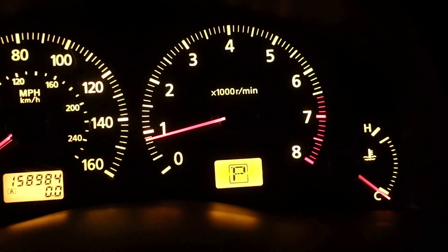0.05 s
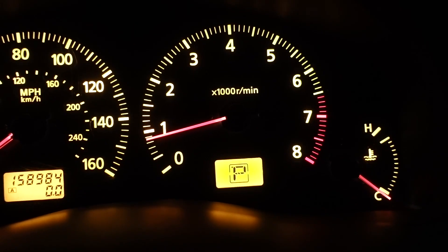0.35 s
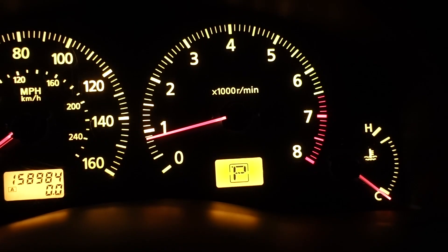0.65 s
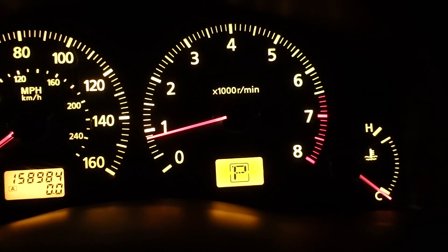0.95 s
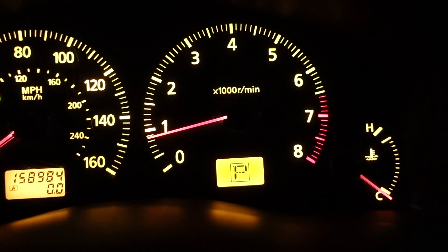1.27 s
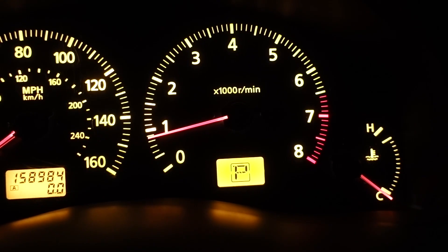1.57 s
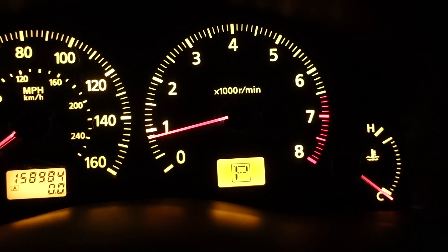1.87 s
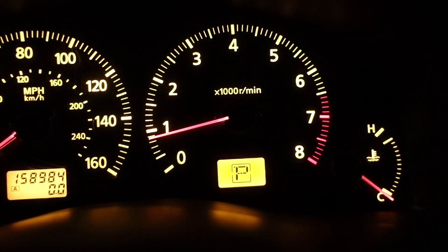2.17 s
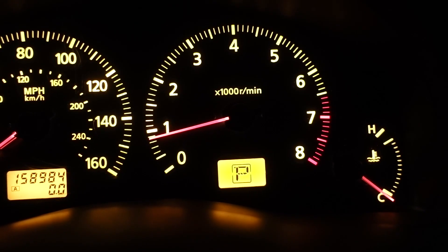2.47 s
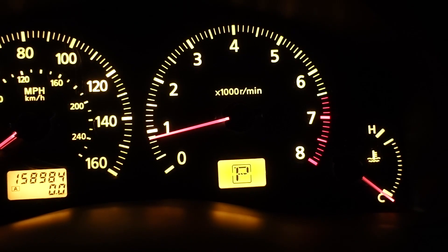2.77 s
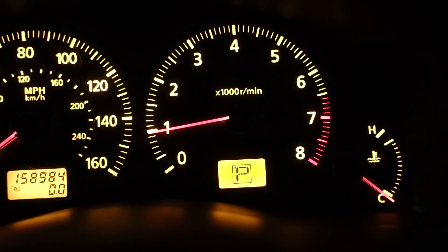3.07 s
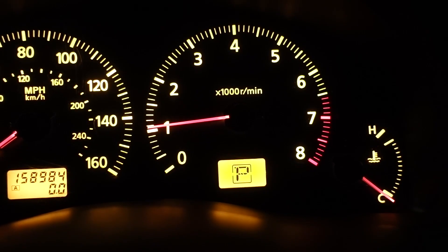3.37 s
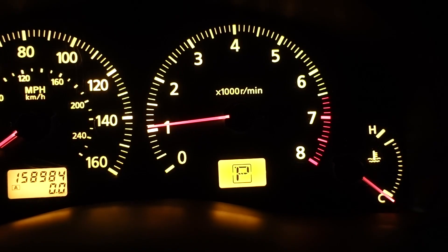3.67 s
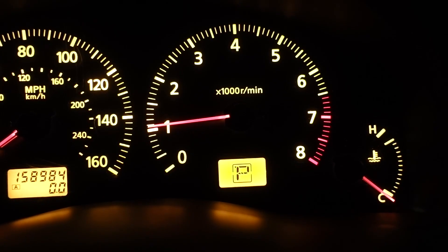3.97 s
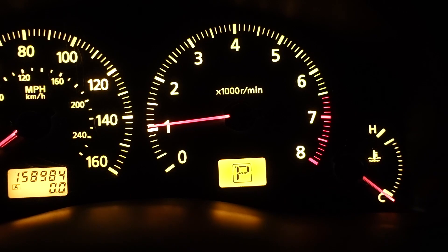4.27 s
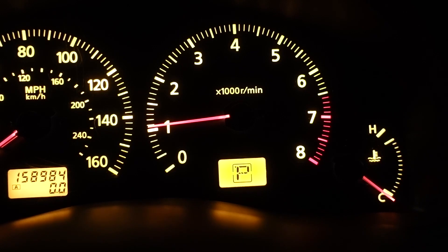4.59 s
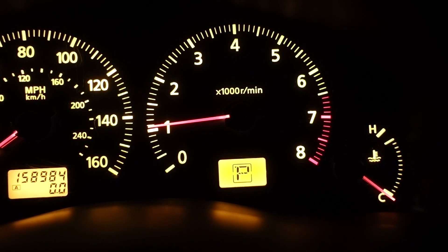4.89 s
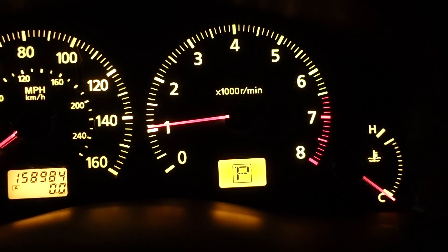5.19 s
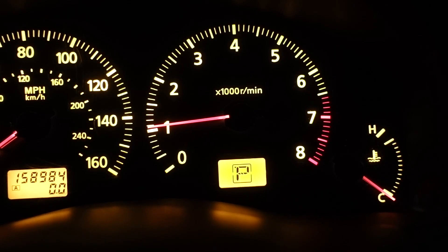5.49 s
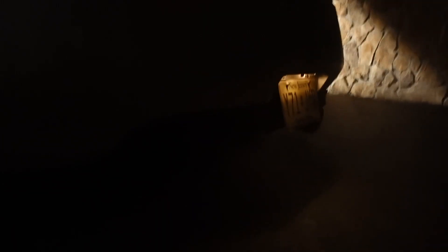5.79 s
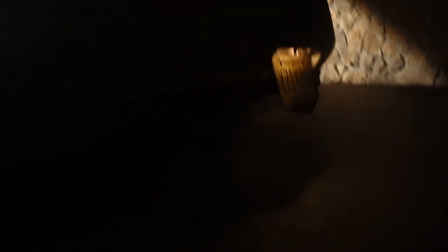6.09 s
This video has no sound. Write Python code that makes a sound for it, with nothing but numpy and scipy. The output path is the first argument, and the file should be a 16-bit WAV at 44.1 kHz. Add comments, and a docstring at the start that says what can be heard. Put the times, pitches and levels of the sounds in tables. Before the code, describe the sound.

Heard from the cabin, a misfiring car engine chugs, rises to a smoother fast idle, then is suddenly heard outside, slower and louder.

```python
"""A cold six-cylinder car engine idles in a garage, heard from the driver's seat.
It misfires and sags about four times a second, then the speed rises and the beat evens out.
Firing pulses boom through the exhaust, buzz the panels and swell the gas rush; accessories hiss and
whine. Near the end the listener is abruptly outside, where the slow idle booms and stumbles again."""
import sys
import numpy as np
from scipy import signal
from scipy.fft import rfft, irfft, next_fast_len
from scipy.io import wavfile
from scipy.ndimage import uniform_filter1d, minimum_filter1d

SR = 44100
rng = np.random.default_rng(int(sys.argv[2]) if len(sys.argv) > 2 else 0)


def dump(signal):
    """Clip the signal to [-1, 1] and save it as 16-bit WAV at the path in sys.argv[1]."""
    limited = np.clip(np.atleast_2d(signal).T, -1, 1)
    pcm = np.round(limited * 32767).astype(np.int16)
    wavfile.write(sys.argv[1], SR, pcm)


N = 279505
FFT_SIZE = next_fast_len(N + SR)
TIME_S, BIN_HZ = np.arange(N) / SR, np.fft.rfftfreq(FFT_SIZE, 1 / SR)
OUTSIDE_AT_S, RISE_AT_S = 5.595, 2.924

# Each row: time in seconds, dip of firing strength in dB.
MISFIRES = [(0.099, -4.5), (0.363, -14.5), (0.619, -7.5), (0.881, -9), (1.178, -11), (1.418, -9),
            (1.684, -13), (1.967, -14.5), (2.239, -8), (2.509, -7.5), (6.207, -20), (6.284, -17)]
# Firing order; two banks with unequal pipes alternate. Each row: strength in dB, lag in seconds.
FIRING_ORDER = [(-1.07, 0.004413), (0.5, 0.005507), (-1.5, .0045), (2.03, 0.005474), (-1, 0.004455),
                (1.4, 0.0053)]
# Exhaust and air resonances at each place. Each row: frequency in Hz, width in Hz, gain in dB.
CABIN_MODES = [(45.2, 4.2, -11.5), (87.2, 26.3, -2.54), (117, 12.5, -3.5), (152.94, 42.56, 8),
               (165.2, 38.68, 9), (198.03, 7.47, -0.6), (260.2, 24.3, -15), (288.9, 25.3, -18)]
GARAGE_MODES = [(55.32, 17, -5), (97.7, 43.6, 0.1), (117, 4.9, -4.5), (147.6, 16.49, 14),
                (156.8, 27.6, 12.5), (199, 5, -6), (271.4, 28.4, -9), (286.2, 12, -4.5)]
# Panel and pipe resonances. Each row: frequency in Hz, width in Hz, gain in dB.
PANEL_MODES = [(387.8, 9.4, 5.5), (430, 50, -8), (540.7, 12, -2.5), (655, 40, -12), (704.6, 24, -10),
               (985, 10, -16.5), (1210, 47, -19.5)]
# Spectral shapes. Each row: frequency in Hz, relative level in dB.
RUSH_SPECTRUM = [(150, -24.5), (270, 6), (400, 1.5), (520, 1.5), (720, -2), (820, -11), (1250, -13.5),
                 (1500, -23), (2500, -26.5), (5000, -51.5)]
CABIN_HISS_SPECTRUM = [(600, -12.5), (1500, 0.5), (2200, -1.5), (2900, 0), (3400, -4.5), (4400, -4.5),
                       (5200, -8.5), (6500, -16), (8500, -16), (11000, -20.5)]
GARAGE_HISS_SPECTRUM = [(600, -11), (1300, 11.5), (2000, 8), (2600, 3), (3200, -4.5), (4300, -1.5),
                        (5500, -9), (7500, -17), (11000, -29.5)]
RUMBLE_SPECTRUM = [(10, -5.5), (30, -2.5), (50, -1), (100, 2.5), (180, -1), (230, -9.5), (300, -12),
                   (450, -31), (900, -63.5)]
TICK_SPECTRUM = [(200, -10), (550, 2), (1000, -3), (2000, -13), (4000, -26), (10000, -50)]
# Each row: time in seconds, relative peak in dB.
TICK_EVENTS = [(2.7156, -43.5), (2.756, -38.5), (3.0668, -39), (3.1007, -37.5), (3.168, -39), (3.2678, -36),
               (4.3369, -39), (4.7185, -38.5), (5.9687, -33), (6.0126, -34.5)]
# Each row: frequency in Hz, level in dB, rms waver in Hz, change at top speed in dB.
ACCESSORY_TONES = [(386.3, -45.5, 5, -10), (976, -61.5, 8, -3), (1196, -60.5, 25, -4),
                   (1333, -64.5, 22, -6.5), (3650, -76, 30, -4), (4170, -68, 28, -2), (4320, -75, 45, 1.5),
                   (6690, -80, 22, 2.5), (10800, -82.5, 9.7, -2)]
# Each row: frequency in Hz, left lead in radians, left-right coherence, left minus right in dB.
STEREO_IMAGE = [(30, .35, 1, 0), (75, .5, 1, 0), (180, .96, 1, 0), (520, 1.45, .97, -1.2),
                (1100, 1.2, .87, -1.5), (2000, 1.1, .7, -3), (4000, 1.4, .5, -5), (6000, 1.7, .45, -9),
                (10500, 3, .4, -11)]


def firings(gap_s=.027, sag=.12, recovery_s=.031, fast_db=-1.5, throttle_db=2,
            scatter_db=1.23, jitter_s=.0001, limp_db=1.5, limp_until_s=2.2):
    """Time, strength and cylinder of each firing; a misfire slows the crank, which then recovers."""
    misfire_s, depth_db = np.transpose(MISFIRES)
    since_s = TIME_S[:, None] - misfire_s
    dip_db = bell(since_s, gap_s) @ depth_db
    effort_db = by_place(fast_db * fast_idle() + throttle_db * throttle(), 0)
    age = np.maximum(1 + since_s / recovery_s, 0)
    speed_loss = sag * (age * np.exp(1 - age)).sum(1)
    rate_hz = crank_rpm() * (1 - speed_loss) * 3 / 60  # three firings a turn
    count = np.cumsum(rate_hz) / SR
    number = np.arange(-len(FIRING_ORDER), int(count[-1]))
    times_s = np.interp(number, count, TIME_S) + np.minimum(number, 0) / rate_hz[0]
    cylinder = number % len(FIRING_ORDER)
    cylinder_db, lag_s = np.array(FIRING_ORDER)[cylinder].T
    bank_db = limp_db * (2 * (cylinder % 2) - 1) * (times_s < limp_until_s)  # one bank pulls harder
    scatter, jitter = rng.standard_normal((len(number), 2)).T
    drive_db = np.interp(times_s, TIME_S, effort_db + dip_db)
    strength = amp(drive_db + cylinder_db + bank_db + scatter_db * scatter)
    return times_s + lag_s + jitter_s * jitter, strength, cylinder


def crank_rpm(slow_rpm=941.6, fast_rpm=1138.6, outside_rpm=897.7, settle_s=.364):
    """Speed before misfire sag: climbs, overshoots, settles; slow again outside."""
    flare_rpm = 171.9 * np.exp(-np.maximum(TIME_S - RISE_AT_S, 0) / settle_s)
    return by_place(slow_rpm + fast_idle() * (fast_rpm + flare_rpm - slow_rpm), outside_rpm)


def fast_idle(rise_s=.141):
    """Rises from 0 at slow idle to 1 at fast idle."""
    return 1 / (1 + np.exp(-(TIME_S - RISE_AT_S) / rise_s))


def throttle(at_s=2.97, sigma_s=.2):
    """The idle valve opens once: 0 to 1 and back."""
    return bell(TIME_S - at_s, sigma_s)


def exhaust(times_s, strength, cabin_db=38, garage_db=40, cabin_lag_s=.01332, garage_lag_s=.016):
    """Rounded pressure pulses leave the pipe and boom in the cabin or the garage."""
    pulse = lowpass(corner_hz=450)
    inside = stereo(clicks(times_s + cabin_lag_s, strength) * pulse * ring(CABIN_MODES))
    outside = stereo(clicks(times_s + garage_lag_s, strength) * pulse * ring(GARAGE_MODES))
    return -by_place(amp(cabin_db) * inside, amp(garage_db) * outside)


def lurches(gain_db=-24, after_s=.09):
    """After a misfire the engine lurches on its mounts; the cabin gives a low rising chuff."""
    chuffs = sum(boom(at_s + after_s, hz=80, sigma_s=.058, glide_hz_per_s=120) for at_s, _ in MISFIRES)
    return amp(gain_db) * stereo(rfft(by_place(chuffs, 0), FFT_SIZE))


def catch_boom(gain_db=-19):
    """The cabin booms as the engine catches and speeds up."""
    sweep = boom(at_s=2.93, hz=196, sigma_s=.05, glide_hz_per_s=60)
    return amp(gain_db) * stereo(rfft(sweep, FFT_SIZE))


def panel_throb(times_s, cylinder, rms_db=-38, hz=289, width_hz=9, lag_s=.017, from_s=3.7):
    """At fast idle one cylinder rings a panel every two turns."""
    hits_s = times_s[(cylinder == 0) & (times_s > from_s) & (times_s < OUTSIDE_AT_S)]
    panel = stereo(clicks(hits_s + lag_s) * lowpass(corner_hz=370) * ring([(hz, width_hz, 0)]))
    active = (TIME_S > from_s) & (TIME_S < OUTSIDE_AT_S)
    return amp(rms_db) * panel / panel[:, active].std()


def rumble(cabin_db=-35.5, garage_db=-29.5):
    """Low roar of uneven combustion."""
    return noise(RUMBLE_SPECTRUM) * by_place(amp(cabin_db), amp(garage_db))


def panel_buzz(times_s, strength, gain_db=-1, outside_db=4, lag_s=.016, scatter_db=1):
    """Each firing shakes the panels, never quite equally."""
    blows = np.sqrt(strength) * amp(scatter_db * rng.standard_normal(len(times_s)))
    panels = stereo(clicks(times_s + lag_s, blows) * lowpass(corner_hz=1300) * ring(PANEL_MODES))
    return amp(gain_db) * unit_rms(panels) * by_place(.86, amp(outside_db))


def gas_rush(times_s, strength, gain_db=.37, lag_s=.016, steady=.92):
    """Steady flow noise that swells with each firing."""
    puffs = pulse_envelope(times_s + lag_s, strength ** 2, decay_s=.019)
    return amp(gain_db) * noise(RUSH_SPECTRUM) * unit_rms(steady + puffs)


def dull_ticks(times_s, cylinder, cycle_db=-37.5, hard_beat_db=-38,
               lag_s=.017, after_s=.122, decay_s=.0034, from_s=3.6):
    """Dull ticks, inside only: on the first hard beat after a misfire, and once a cycle at fast idle."""
    cycle_s = times_s[(cylinder == 3) & (times_s > from_s)] + lag_s
    hard_beat_s = np.array(MISFIRES)[:, 0] + after_s
    train = irfft(amp(cycle_db) * clicks(cycle_s) + amp(hard_beat_db) * clicks(hard_beat_s), FFT_SIZE)
    envelope = signal.lfilter([1], [1, -np.exp(-1 / (decay_s * SR))], train[:N])
    bursts = by_place(envelope, 0) * rng.standard_normal(N)
    colour = amp(per_bin(TICK_SPECTRUM)[0]) * lowpass(corner_hz=1500)
    return stereo(rfft(bursts, FFT_SIZE) * unit_rms(colour))


def ticks(gain_db=11.5):
    """Scattered dry ticks."""
    colour = amp(per_bin(TICK_SPECTRUM)[0])
    unit_tick = colour / irfft(colour, FFT_SIZE).max()
    at_s, peak_db = np.transpose(TICK_EVENTS)
    return stereo(unit_tick * clicks(at_s, amp(peak_db + gain_db)))


def intake_gulp(growl_db=-38, hiss_db=-61.5, at_s=2.95, sigma_s=.07):
    """Short growl and hiss of intake air as the engine catches."""
    air = amp(growl_db) * noise(RUSH_SPECTRUM) + amp(hiss_db) * noise(CABIN_HISS_SPECTRUM)
    return bell(TIME_S - at_s, sigma_s) * air


def bay_hiss(times_s, cabin_db=2, garage_db=5, lag_s=.0092, tap_depth=.09, flutter_db=.55):
    """Intake, belts and valve gear hiss, pulsing lightly with the firings."""
    taps = pulse_envelope(times_s + lag_s, 1, decay_s=.004)
    inside = amp(cabin_db) * noise(CABIN_HISS_SPECTRUM)
    outside = amp(garage_db) * noise(GARAGE_HISS_SPECTRUM)
    return by_place(inside, outside) * unit_rms(1 + tap_depth * taps) * amp(flutter_db * drift(60))


def accessory_whines(flutter_db=3, outside_db=-7):
    """Thin wavering tones, clearest in the cabin; most fade as the speed rises."""
    rpm = crank_rpm()
    speed_share = (rpm - rpm.min()) / np.ptp(rpm)
    tones = np.zeros(N)
    for hz, level_db, waver_hz, change_db in ACCESSORY_TONES:
        cycles = np.cumsum(hz + waver_hz * drift(60)) / SR
        gain = amp(level_db + change_db * speed_share + flutter_db * drift(26))
        tones += gain * np.sin(2 * np.pi * cycles)
    return stereo(rfft(tones, FFT_SIZE)) * by_place(.94, amp(outside_db))


def scuff(level_db=-49, at_s=6.175, sigma_s=.022):
    """A brief soft scuff in the garage."""
    return amp(level_db) * noise(GARAGE_HISS_SPECTRUM) * bell(TIME_S - at_s, sigma_s)


def amp(db):
    """Decibels to gain."""
    return 10 ** (np.asarray(db) / 20)


def unit_rms(x):
    """Scales to rms 1."""
    return x / np.sqrt(np.mean(x ** 2) + 1e-20)


def bell(since_s, sigma_s):
    """Gaussian envelope, peak 1."""
    return np.exp(-.5 * (since_s / sigma_s) ** 2)


def boom(at_s, hz, sigma_s, glide_hz_per_s):
    """Short gliding tone centred on at_s."""
    since_s = TIME_S - at_s
    cycles = (hz + .5 * glide_hz_per_s * since_s) * since_s
    return bell(since_s, sigma_s) * np.cos(2 * np.pi * cycles)


def clicks(times_s, sizes=1):
    """Spectrum of an impulse train."""
    samples = np.round(times_s * SR).astype(int) % FFT_SIZE
    return rfft(np.bincount(samples, sizes * np.ones(len(samples)), FFT_SIZE))


def pulse_envelope(times_s, sizes, decay_s):
    """Exponentially decaying pulses, rms 1."""
    spectrum = clicks(times_s, sizes) / (1 + 2j * np.pi * BIN_HZ * decay_s)
    return unit_rms(irfft(spectrum, FFT_SIZE)[:N])


def lowpass(corner_hz):
    """Spectrum of a soft-edged pulse."""
    return 1 / (1 + (BIN_HZ / corner_hz) ** 8)


def ring(modes):
    """Response of a body's resonances; neighbouring modes alternate in sign."""
    return sum((-1) ** k * amp(db) / (1 + 1j * (BIN_HZ ** 2 - hz ** 2) / (BIN_HZ * width_hz + 1e-9))
               for k, (hz, width_hz, db) in enumerate(modes))


def per_bin(rows):
    """Columns of a frequency table, interpolated to every bin."""
    hz, *columns = np.transpose(rows)
    return [np.interp(np.log(BIN_HZ + 1), np.log(hz), column) for column in columns]


def drift(rate_hz, points=8192):
    """Random wander up to about rate_hz, rms 1."""
    step_s = N / SR / points
    rolloff = np.exp(-(np.fft.rfftfreq(points, step_s) / rate_hz) ** 2)
    wander = irfft(rfft(rng.standard_normal(points)) * rolloff)
    return np.interp(TIME_S, np.arange(points) * step_s, unit_rms(wander))


def noise(shape):
    """Diffuse shaped noise; the channel mean has rms 1."""
    pair = stereo(rfft(rng.standard_normal(FFT_SIZE)) * amp(per_bin(shape)[0]), diffuse=True)
    return pair / pair.mean(0).std()


def stereo(spectrum, diffuse=False):
    """Spectrum to left and right signals; diffuse sound is less coherent."""
    lead_rad, coherence, balance_db = per_bin(STEREO_IMAGE)
    right, coherence = spectrum, np.clip(coherence, 0, 1)
    if diffuse:
        random_phase = np.exp(2j * np.pi * rng.random(len(BIN_HZ)))
        right = spectrum * (coherence + np.sqrt(1 - coherence ** 2) * random_phase)
    pan = amp(balance_db / 2) * np.exp(.5j * lead_rad)
    return irfft(np.array([spectrum * pan, right / pan]), FFT_SIZE)[:, :N]


def by_place(inside, outside):
    """Cabin until OUTSIDE_AT_S, then garage."""
    fade = uniform_filter1d((TIME_S > OUTSIDE_AT_S) * 1., size=200)
    return inside * (1 - fade) + outside * fade


def limiter(x, ceiling_db=-8, release_db_per_s=29.5):
    """Gain snaps down ahead of each peak, ticking on the hardest beats, then creeps back."""
    needed_db = np.minimum(ceiling_db - 20 * np.log10(abs(x).max(0) + 1e-9), 0)
    held_db = minimum_filter1d(needed_db, size=321)
    creep_db = release_db_per_s * TIME_S
    gain_db = np.minimum.accumulate(held_db - creep_db) + creep_db
    return x * amp(uniform_filter1d(uniform_filter1d(gain_db, size=9), size=6))


def scene():
    """One firing train drives the pulsed layers; rush and hiss grow at fast idle and outside."""
    times_s, strength, cylinder = firings()
    body_db = -46 + by_place(1.7 * fast_idle() + .3 * throttle(), 10.5)
    hiss_growth_db = 2 * np.maximum(TIME_S - 3.6, 0)
    hiss_db = -62.5 + by_place(hiss_growth_db + .5 * throttle(), 3)
    low = exhaust(times_s, strength) + lurches() + catch_boom()
    low += panel_throb(times_s, cylinder) + rumble()
    body = amp(body_db) * (panel_buzz(times_s, strength) + gas_rush(times_s, strength))
    top = amp(hiss_db) * bay_hiss(times_s) + accessory_whines()
    transients = ticks() + dull_ticks(times_s, cylinder) + intake_gulp() + scuff()
    return low + body + top + transients


def record(dry):
    """Peak limiter, then a steep low-pass."""
    cutoff_hz = 11000
    taps = signal.firwin(1023, cutoff_hz, window=("kaiser", 9), fs=SR)
    return signal.oaconvolve(limiter(dry), taps[None], "same")


dry = scene()
out = record(dry)
dump(out)
```